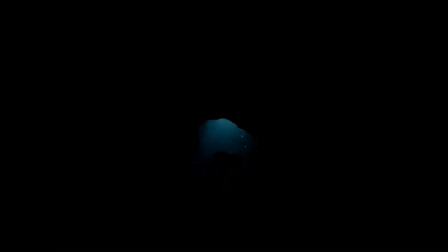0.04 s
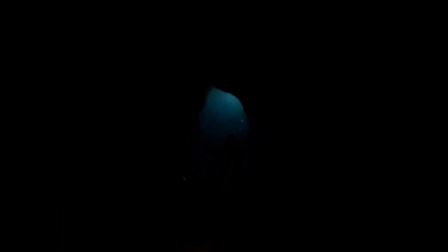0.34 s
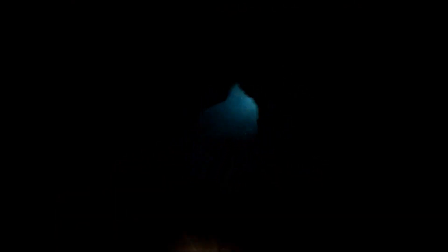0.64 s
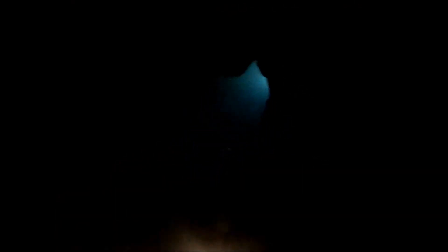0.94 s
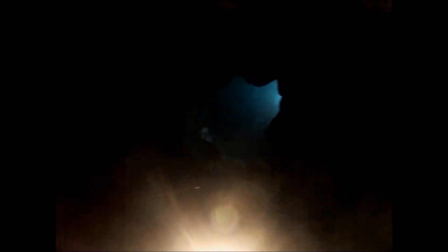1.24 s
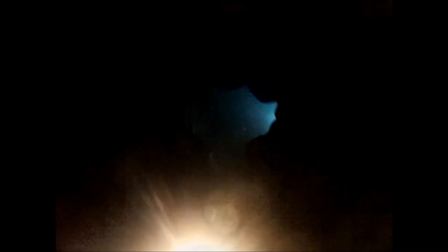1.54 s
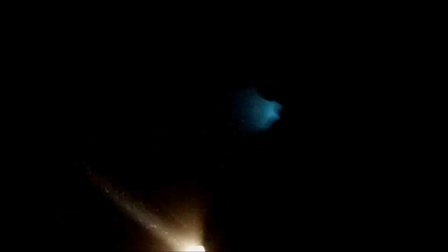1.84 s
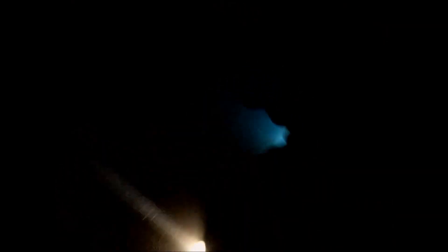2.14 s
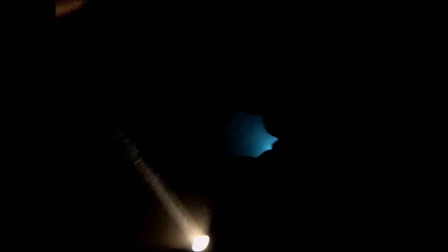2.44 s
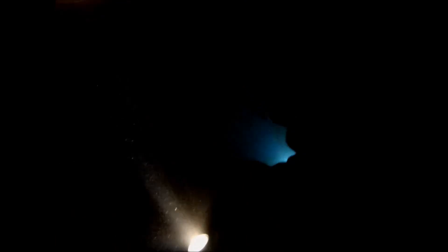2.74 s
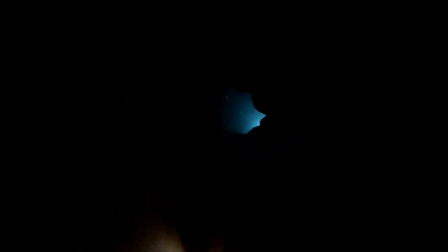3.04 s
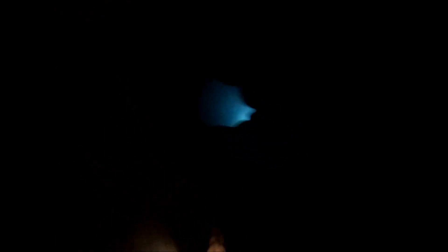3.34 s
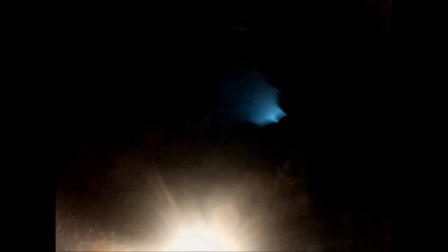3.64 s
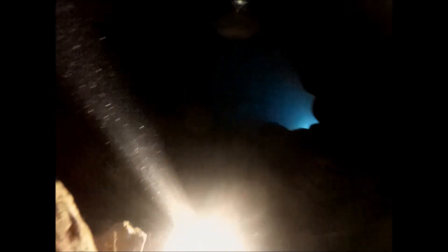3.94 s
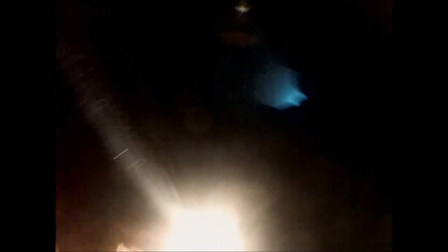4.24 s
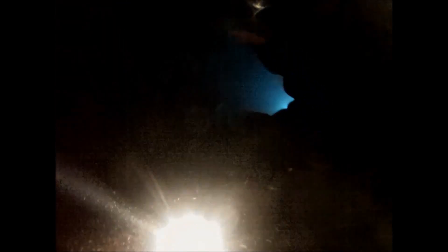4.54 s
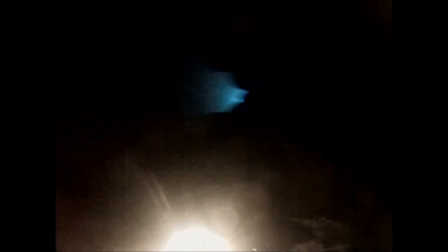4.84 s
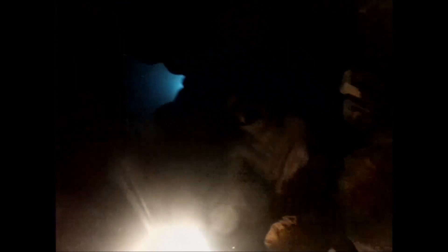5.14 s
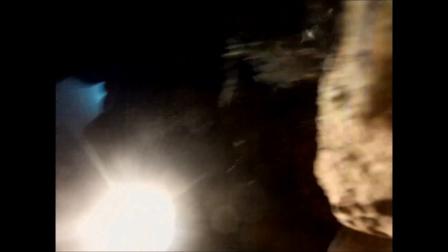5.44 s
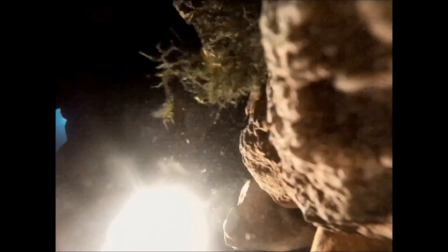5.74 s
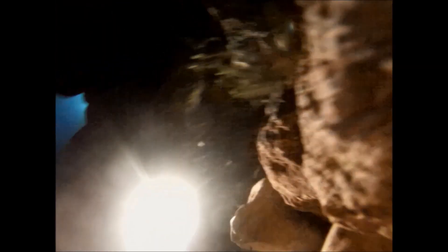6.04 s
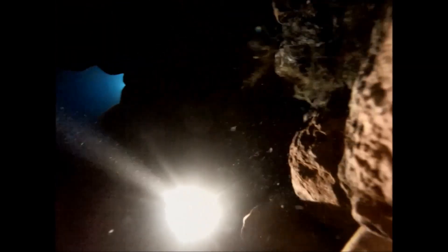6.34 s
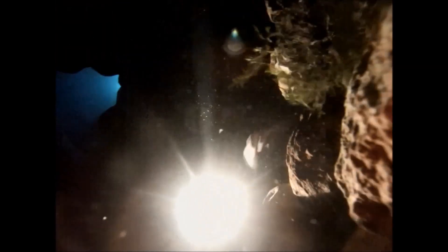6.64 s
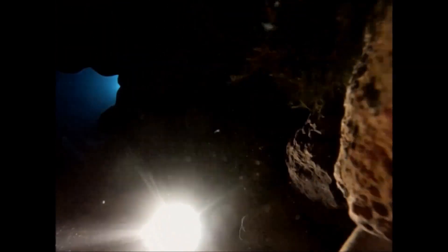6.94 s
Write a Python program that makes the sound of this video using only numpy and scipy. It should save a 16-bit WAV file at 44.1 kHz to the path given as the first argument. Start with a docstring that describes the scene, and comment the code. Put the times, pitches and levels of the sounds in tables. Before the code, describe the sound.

A waterproof camera housing bumps, rattles and scrapes underwater, heard from inside, with gulps of water and a few small bubble chirps.

```python
"""Camera housing in a flooded cave

Underwater, on the move, the microphone sealed inside a camera's waterproof housing. Knocks, rattles
and rubbing reach it straight through the shell, which sways on its mount. Gulps of air and water and
heavy knocks thump close by, and the heaviest overload it. Bubbles chirp, metal gear clinks, and behind
it all lie a hiss, low churning and one faint whistle."""
import sys
import numpy as np
from scipy import signal
from scipy.fft import rfft, irfft
from scipy.io import wavfile
from scipy.ndimage import uniform_filter1d

SR = 44100
rng = np.random.default_rng(int(sys.argv[2]) if len(sys.argv) > 2 else 0)


def generate_wav(sig):
    """Save sig (samples, or channels by samples) to the path in sys.argv[1] as 16-bit PCM at SR."""
    pcm = np.round(np.clip(np.atleast_2d(sig).T, -1, 1) * 32767).astype(np.int16)
    wavfile.write(sys.argv[1], SR, pcm)


N = 312669
TIME = np.arange(N) / SR
CONTACT_SPAN = 0.005 * SR  # a contact's level is its rms as if packed into this many samples


def amp(db):
    """Decibels to gain."""
    return 10 ** (np.asarray(db) / 20)


def unit(x):
    """Scales to an rms of one."""
    return x / np.sqrt(np.mean(x ** 2) + 1e-20)


def follow(curve):
    """A (time, value) curve at every sample."""
    return np.interp(TIME, *np.transpose(curve))


def add(mix, start_s, sound):
    """Mixes a sound in at its start time."""
    part = mix[max(round(start_s * SR), 0):][:len(sound)]
    part += sound[:len(part)]


def band(x, edges, order):
    """Causal band-pass."""
    return signal.sosfilt(signal.butter(order, edges, "bandpass", fs=SR, output="sos"), x)


def noise(colour):
    """Steady noise with the given spectrum."""
    hz, db = np.transpose(colour)
    gain = amp(np.interp(np.log(np.fft.rfftfreq(N, 1 / SR) + 1), np.log(hz), db))
    return unit(irfft(gain * rfft(rng.standard_normal(N)), N))


def wander(per_s):
    """A random drift of about unit size."""
    return np.interp(TIME * per_s, np.arange(N), rng.standard_normal(N))


def slips(size, per_s, spread_db):
    """A train of tiny clicks of uneven size."""
    strengths = amp(spread_db * np.minimum(rng.exponential(1, size), 4))
    return unit((rng.random(size) < per_s / SR) * rng.choice([-1, 1], size) * strengths)


# spectrum of the background hiss: (frequency [Hz], density [dB])
HISS_SPECTRUM = [(20, 2.5), (60, -5.5), (120, -2.5), (280, -8.5), (500, -13), (1000, -16), (2000, -17.5),
                 (3000, -21), (6000, -29), (10000, -34), (14500, -41.5), (16000, -52.5)]
# its rise and fall: (time [s], level [dB])
HISS_LEVEL = [(0, 2.5), (2.76, 1.5), (3.1, -13), (3.7, -10), (4.2, -10.5), (4.7, 1), (5.35, 3), (5.65, 1.5),
              (7.08, 2.5)]

def hiss(level_db=-60):
    """A hiss behind everything, lower through the heavy blows."""
    return amp(level_db + follow(HISS_LEVEL)) * noise(HISS_SPECTRUM)


# swell of the whistle: (time [s], level [dB])
WHISTLE_LEVEL = [(1.21, -100), (1.235, -77), (1.3, -74), (1.33, -100)]
# its partials: (frequency [Hz], level [dB])
WHISTLE_PARTIALS = [(6580, 12), (9800, 0.5), (13050, -4.5)]

def whistle(waver=0.006):
    """A thin, wavering whistle that surfaces briefly in the background."""
    phase_per_hz = 2 * np.pi * np.cumsum(1 + waver * wander(400)) / SR
    tone = sum(amp(db) * np.sin(hz * phase_per_hz) for hz, db in WHISTLE_PARTIALS)
    return amp(follow(WHISTLE_LEVEL)) * tone


# water moving just outside the housing: (time [s], level [dB])
CHURN_LEVEL = [(3.78, -35), (3.87, -32.5), (4.08, -56), (4.28, -60.5), (4.48, -28), (4.66, -44),
               (4.82, -43), (5, -21.5), (5.11, -24.5), (5.22, -29.5), (5.5, -33.5), (5.65, -58),
               (5.93, -34.5), (6.06, -74), (6.28, -35), (6.42, -47.5), (6.84, -42), (7, -75.5)]
# its spectrum: (frequency [Hz], density [dB])
CHURN_SPECTRUM = [(20, -8.5), (60, 7), (170, 0), (260, -9), (450, -19.5), (900, -26.5), (3000, -80)]

def churn(level_db=-5, wake_db=9.5, wake_s=0.051, size=20000):
    """Water churns past the moving housing, stirred up for a moment by each bump."""
    fade_in = np.clip((TIME - CHURN_LEVEL[0][0]) * 20, 0, 1)
    wake = np.ones(N)
    for start, *_ in HOUSING_BUMPS:
        add(wake, start, amp(wake_db) * np.exp(-TIME[:size] / wake_s))
    return fade_in * wake * amp(follow(CHURN_LEVEL) + level_db) * noise(CHURN_SPECTRUM)


def chirp(db, hz, t60, glide, wobble=0.045, rise_s=0.00037, size=8000):
    """One ringing tone, its wobbling pitch creeping upward as it dies."""
    t = TIME[:size]
    waver = 1 + wobble * unit(uniform_filter1d(rng.standard_normal(size), size=60))
    pitch = np.minimum(hz * waver * 2 ** (glide * t), SR / 2)
    envelope = amp(db - 60 * t / t60) * (1 - np.exp(-t / rise_s))
    return envelope * np.sin(2 * np.pi * np.cumsum(pitch) / SR)


# bubble chirps, short clicks and the brief ring of hard knocks:
# (time [s], level [dB], pitch [Hz], t60 [s], glide [octaves/s])
CHIRPS_AND_PINGS = [(.333, -37, 2390, 0.0024, 1), (0.361, -30, 303, 0.026, 5),
                    (.377, -49, 2390, 0.15, 0.28), (0.389, -40, 478, 0.054, 3.3),
                    (0.614, -46, 4900, 0.036, 1), (1.051, -40, 6270, 0.02, 30),
                    (1.057, -42, 9800, 0.011, 8.9), (1.832, -50, 5330, 0.045, 2.2),
                    (2.768, 2, 1613, 0.015, 1), (2.992, -24.5, 479, 0.023, 2.6),
                    (3.0201, -1.5, 1654, 0.015, 1), (3.029, -50, 1526, 0.12, .2),
                    (5.446, -7.5, 1180, 0.017, 3.4), (5.88, -42.5, 1057, 0.17, 0.37),
                    (6.336, -56, 3280, 0.51, .1), (6.43, -46.5, 3370, 0.078, 0.07),
                    (6.433, -40.5, 1990, .08, 0.13)]

def chirps_and_pings(far_count=45, far_db=-66, spread_db=10, low_hz=300, octaves=4, ring_cycles=50):
    """Bubbles chirp, clicks tick and hard knocks ring, over faint bubbles farther off in the cave."""
    out = np.zeros(N)
    for start, db, hz, t60, glide in CHIRPS_AND_PINGS:
        add(out, start, chirp(db, hz, t60, glide))
    for when, smallness, nearness in rng.random((far_count, 3)):
        hz = low_hz * 2 ** (octaves * smallness)
        add(out, when * N / SR, chirp(far_db + spread_db * nearness, hz, ring_cycles / hz, glide=2))
    return out


# metal gear touching, heard from inside the housing: (time [s], clack [dB], ring [dB], pitch [ratio])
GEAR_CLINKS = [(6.594, -37, -70, 1), (6.7359, -25, -30, 1), (6.842, -51, -53, 1.34), (6.856, -52, -51, 1),
               (6.8758, -33.5, -40.5, 1.03)]
# modes of the gear: (frequency [Hz], level [dB], t60 [s])
GEAR_MODES = [(3120, 7, 0.023), (4030, -2, 0.024), (5940, 0.5, 0.069), (6250, -23, 0.077), (7250, -9, .06)]

def clinks(shell, clack_hz=(1900, 7000), fade_s=0.003, size=3000):
    """Metal gear touches: a thin clack through the shell, and the metal's own high ring."""
    out = np.zeros(N)
    for start, clack_db, ring_db, pitch in GEAR_CLINKS:
        touch = np.diff(rng.standard_normal(size + 1)) * np.exp(-TIME[:size] / fade_s)
        clack = band(signal.fftconvolve(touch, shell)[:size], clack_hz, order=3)
        add(out, start, amp(clack_db) * clack * np.sqrt(CONTACT_SPAN) / np.linalg.norm(clack))
        add(out, start, amp(ring_db) * ring([(hz * pitch, db, t60) for hz, db, t60 in GEAR_MODES]))
    return out


def ring(modes, size=26000):
    """Dying sines of a struck object."""
    t = TIME[:size]
    return sum(amp(db - 60 * t / t60) * np.sin(2 * np.pi * hz * t) for hz, db, t60 in modes)


# low thumps close by: gulps of air and water, and the thud of heavy knocks:
# (time [s], level [dB], pitch [Hz], length [cycles])
LOW_THUMPS = [(0.333, -24, 40, 0.63), (1.668, -35, 63, 3.9), (2.765, 12, 495, 0.5), (2.991, -20, 247, 0.57),
              (3.6797, 0.5, 259, 0.49), (3.7245, 7.5, 146, 0.7), (3.803, -2, 145, 0.66),
              (3.83, -12, 157, 0.71), (3.845, -19, 129, 1.9), (3.905, -14, 100, 1.1),
              (3.926, -19.5, 76, 1.33), (3.996, -25, 111, 0.97), (4.327, -36.5, 94, 2.2),
              (4.455, -21.5, 250, 1.6), (4.715, -21.5, 75, 0.31), (4.95, -13, 77, 0.84),
              (4.979, -8, 84.5, 1.95), (5.002, -12.5, 71, 0.58), (5.05, -12.5, 55, 1.2),
              (5.071, -16, 58, 4.3), (5.103, -15, 48, 0.49), (6.258, -21.5, 68.6, 2.7),
              (6.657, -28, 71, 2.9)]

def thumps(onset_cycles=0.011, wobble_db=-27, wobble_cycles=1.2, size=6000):
    """A gulp or a heavy knock swings the pressure: a dip, a rebound, and a faint wobble after it."""
    out = np.zeros(N)
    for start, db, hz, length in LOW_THUMPS:
        cycles = hz * TIME[:size]
        onset = 1 - np.exp(-(cycles / onset_cycles) ** 2)
        fall = np.exp(-(cycles / length) ** 3) + amp(wobble_db) * np.exp(-cycles / wobble_cycles)
        add(out, start, -amp(db) * onset * fall * np.sin(2 * np.pi * cycles))
    return out


# resonances of the shell around the microphone: (frequency [Hz], width [Hz], level [dB])
SHELL_RESONANCES = [(269, 450, 2), (463, 30, -6.5), (706, 250, 2.5), (1123, 490, 3.5), (1494, 570, 4),
                    (1574, 120, 3), (1654, 390, 2.5), (2139, 480, 4.5), (2454, 400, -2),
                    (3330, 2200, -15.5), (3444, 1200, -15.5), (5260, 1500, -17.5), (6040, 1300, -21.5),
                    (6960, 990, -24.5), (8510, 1200, -39), (10340, 3400, -42), (13000, 7700, -41)]
# the shell's body, middle, edge and fizz bands: (low [Hz], high [Hz])
SHELL_BANDS = [(190, 900), (900, 2800), (2800, 8000), (8000, 14500)]

def shell_response(size=2048):
    """The shell's minimum-phase impulse response, whole and split into its bands."""
    freqs = abs(np.fft.fftfreq(size, 1 / SR))
    power = sum(amp(db) ** 2 / (1 + ((freqs - hz) / width * 2) ** 2) ** 2
                for hz, width, db in SHELL_RESONANCES)
    log_gain = 0.5 * np.log(power + 1e-10)
    spectrum = np.exp(np.conj(signal.hilbert(log_gain)))
    shell = np.fft.ifft(spectrum).real[:size // 2]
    return shell, np.array([band(shell, edges, order=3) for edges in SHELL_BANDS])


# narrow shell resonances: (frequency [Hz], width [Hz], level over the direct path [dB])
HOLLOW_RESONANCES = [(1010, 61, -3), (1436, 50, 3.5), (1690, 46, 3.5), (2296, 140, -0.5), (3730, 270, -7),
                     (6320, 270, 2.5), (8770, 180, 3)]

def hollow(drive, detune=0.039, uneven_db=4):
    """A rub or chatter builds up narrow resonances that differ a little with the place of contact."""
    out = drive.copy()
    for hz, width, db in HOLLOW_RESONANCES:
        louder, higher = rng.uniform(-1, 1, 2)
        resonator = signal.iirpeak(hz * (1 + detune * higher), hz / width, fs=SR)
        out += amp(db + uneven_db * louder) * signal.lfilter(*resonator, drive)
    return out


# rubs along the shell, close to the microphone:
# (time [s], length [s], level [dB], swell over the stroke [dB], relative treble [dB])
RUB_STROKES = [(0.839, 0.094, -54.5, -25, -15), (1.154, .1, -47, -8, -28), (1.509, 0.1, -59, 10, -16),
               (1.912, 0.17, -58.5, 6, -18), (2.204, .19, -47.5, -7, -14.5), (2.582, 0.23, -68.5, -12, -24),
               (2.785, 0.073, -50, -21.5, -22), (3.239, 0.11, -40.5, -4, -9),
               (3.427, 0.023, -37, -13, -9.5), (3.457, 0.043, -38.5, 18, -10), (3.499, .18, -36, 11, -8),
               (3.687, .11, -52, -4, -13), (3.81, 0.25, -62.5, 0, -4), (4.007, 0.18, -58, 5, -3),
               (4.245, 0.27, -52, 3, -14.5), (4.398, 0.16, -35.5, -1, -11.5), (4.488, 0.067, -46.5, 9, 4),
               (4.56, 0.11, -49.5, -2, -5), (4.741, 0.077, -43.5, 12, -12),
               (4.837, 0.062, -44.5, -24, -7.5), (4.924, 0.42, -36, -4, -4.5),
               (5.169, 0.17, -32.5, 24, 0.5), (5.352, 0.045, -42, -32, -6), (5.391, 0.0385, -38.5, 14, 3),
               (5.715, 0.072, -62, 10, -5), (5.85, 0.092, -55, 3, -3.5)]

def rubbing(shell, trim_db=-1, fizz_db=-6, judder_db=3.5, snags_per_s=60, snag_db=22):
    """Slips and snags drive the shell; each rub has its own brightness, and brighter rubs fizz more."""
    out = np.zeros(N)
    bite, let_go = 0.12, 0.11  # shares of a stroke
    judder = amp(judder_db * wander(130))
    body_hz, middle_hz, edge_hz, fizz_hz = SHELL_BANDS
    low_cut = band(shell, (340, SR / 2 - 1), order=1)
    responses = (band(low_cut, (body_hz[0], middle_hz[1]), order=4),
                 band(shell, edge_hz, order=3),
                 band(shell, (fizz_hz[0], 10300), order=2))
    for start, length, db, swell_db, treble_db in RUB_STROKES:
        size = round(length * SR)
        snags = amp(snag_db) * (rng.random(SR) < snags_per_s / SR)
        friction = slips(SR, per_s=1100, spread_db=2) + snags + 0.28 * rng.standard_normal(SR)
        drive = hollow(friction[:size]) * judder[round(start * SR):][:size]
        dull, edge, fizz = (unit(signal.fftconvolve(drive, path)[:size]) for path in responses)
        progress = np.linspace(0, 1, size)
        touching = np.clip(np.minimum(progress / bite, (1 - progress) / let_go), 0, 1)
        pressure = amp(db + trim_db + swell_db * (progress - 0.5)) * touching
        bright = edge + amp(fizz_db + min(treble_db + trim_db, 0)) * fizz
        add(out, start, pressure * (dull + amp(treble_db) * bright))
    return out


def contact(bands, db, body_db, edge_db, fizz_db, fade_s, tail_db=-20, size=2048):
    """A brief chatter rings the shell in each band; the higher bands have less tail."""
    t = TIME[:size]
    rise_s, tail_s, tail_db_per_band = 0.00045, 0.0093, -4
    tail = amp(tail_db + tail_db_per_band * np.arange(len(bands)))[:, None] * np.exp(-t / tail_s)
    push = (1 - np.exp(-t / rise_s)) * (np.exp(-t / fade_s) + tail)
    chatter = signal.fftconvolve(hollow(push * rng.standard_normal(size)), bands, axes=1)[:, :size]
    chatter /= np.linalg.norm(chatter, axis=1, keepdims=True)
    levels = db + np.array([body_db, 0, edge_db, edge_db + fizz_db])
    return np.sqrt(CONTACT_SPAN) * amp(levels) @ chatter


# taps directly on the shell:
# (time [s], level [dB], body re level [dB], edge re level [dB], fizz re edge [dB])
SHELL_TAPS = [(0.6962, -24.5, -10, -14.5, -33), (1.141, -31, 0.5, -32, -14), (1.6692, -36, -8, -3, -3),
              (1.814, -52, 5, -10, -18), (2.916, -37, -16, -11.5, -34), (2.935, -55.5, -4, 1.5, -19),
              (3.131, -28, -1.5, -9, -17), (3.148, -20, -39, -8.5, -22), (3.429, -30, -15, -21, -15),
              (3.687, -21.5, 0, -1.5, -6.5), (3.723, -23.5, 4, -11, -26), (3.802, -29.5, -4.5, -11.5, -13),
              (3.903, -37.5, -13, -5, -15), (3.918, -43, -22, 3.5, -15), (3.972, -43.5, -9, -12.5, -26),
              (4.004, -50, 6, 8.5, -14), (4.261, -44, -17.5, -11, -24), (4.408, -26, -6.5, -22.5, -28),
              (4.422, -34.5, -18, -1.5, -26), (4.475, -21, -28, -6, -14), (4.492, -18.5, -6, -6, -21),
              (4.528, -38, 2, 10.5, -13), (4.603, -47, 3, 7, -10), (4.711, -41.5, -8, -14.5, -17),
              (4.744, -35.5, -6.5, -26, -15), (4.917, -21.5, -14, -18, -22), (4.951, -20, -6.5, 3, -18),
              (4.979, -20.5, -2, -3, -15), (5.002, -17.5, -34, 1, -11), (5.036, -18, 2, -5.5, -18),
              (5.101, -18, -0.5, -6, -12), (5.136, -28, 9, -4.5, -11), (5.338, -20.5, -28, -0.5, -5),
              (5.34, -13.5, -6, 2, -13), (5.362, -25.5, -11, 0.5, -5), (5.414, -21.5, -16, -4, -7),
              (5.4457, -24, -4, -5, -26), (5.668, -47, 4.5, -28, -12), (6.135, -42.5, -7, 1.5, -13),
              (6.208, -43.5, 6.5, -5, -21.5), (6.253, -28, 2, -23.5, -17.5),
              (6.275, -18.5, -14, -13.5, -35), (6.633, -40.5, 0, -8, -20)]

def taps(bands, lead_s=0.00078):
    """Light, single contacts that leave the mount still."""
    out = np.zeros(N)
    for start, db, *colour in SHELL_TAPS:
        add(out, start - lead_s, contact(bands, db, *colour, fade_s=0.0027))
    return out


# modes of the mount that carries the housing: (frequency [Hz], level [dB], t60 [s])
MOUNT_MODES = [(61.4, -6.5, 0.74), (122.9, 1, 0.31), (155.4, 3, 0.23), (225, -14, 0.38), (292, -4, 0.081),
               (493, -25, 0.33)]

def sway(upper_hz=200, passband_hz=(70, 900)):
    """The mount hums after bumps, each with its own strength of upper hum; a firm grip raises the pitch."""
    out = np.zeros(N)
    for start, *_, sway_db, grip, upper_db in HOUSING_BUMPS:
        modes = [(hz * grip, db + upper_db * (hz > upper_hz), t60) for hz, db, t60 in MOUNT_MODES]
        add(out, start, -amp(sway_db) * ring(modes))
    return band(out, passband_hz, order=2)


def shudder(bands, body_db=-5, edge_db=-23, decay_db_per_s=240, size=4096):
    """The dull, clicking chatter of the housing in its mount until it settles."""
    t = TIME[:size]
    rise_s, loose_s, settle_s = 0.0041, 0.039, 0.0091
    drive = hollow(slips(size, per_s=900, spread_db=4) + 0.3 * rng.standard_normal(size))
    body, middle, edge = (unit(signal.fftconvolve(drive, path)[:size]) for path in bands[:3])
    settling = np.exp(-np.maximum(t - loose_s, 0) / settle_s)
    envelope = np.minimum(t / rise_s, 1) * amp(-decay_db_per_s * t) * settling
    return envelope * (amp(body_db) * body + middle + amp(edge_db) * edge)


# knocks on the housing, carried straight to the microphone:
# (time [s], blow [dB], body re blow [dB], edge re blow [dB], shudder [dB], first rebound [dB],
#  sway [dB], pitch from the grip [ratio], upper sway modes [dB])
HOUSING_BUMPS = [(.6895, -27, -3, -32, -25.5, -37, -25.5, 1, 6),
                 (1.135, -28.5, -7, -39, -33.5, -67, -32, 1, 6.5),
                 (1.191, -35.5, -15, -25, -40, -55, -31, 1, -4),
                 (1.6661, -10, -12, -22.5, -20, -35, -37, 1, 11.5),
                 (2.033, -60, -1, -20, -53, -72, -51.5, 1, -7), (2.24, -66, -10, -20, -43, -65, -45, 1, -1),
                 (2.7644, -8, -11.5, -0.5, -41.5, -46.5, -33, .65, -14),
                 (3.0189, -15, -12, -13, -46, -53, -38.5, 1.02, 3),
                 (3.1396, -22, -10, -16, -33.5, -28, -30, .97, -40),
                 (3.226, -11, -13.5, -13, -33, -34, -31.5, 1, -21),
                 (3.3832, -19, -10, -20, -39.5, -32.5, -29, 1, -17.5),
                 (3.514, -30, -5, -14, -34, -57, -40, 1.01, -2),
                 (3.68, -15.5, 3.5, 1.5, -27, -39, -41.5, 1, -3),
                 (4.4548, -21, -8, 1.5, -30, -51, -30.5, 1.68, 9.5),
                 (4.84, -33, -10, -25, -36.5, -53, -31.5, 1.55, 3),
                 (5.03, -21, -10, -1.5, -19.5, -19, -30, 1.4, -7),
                 (5.485, -10, -11.5, -17, -21.5, -28, -33.5, 1.4, -7),
                 (5.558, -30.5, -12, -9, -26.5, -32.5, -39, 1.25, -14),
                 (5.7, -38.5, -8.5, -6.5, -58, -61, -40, 1.41, 0),
                 (6.256, -14.5, -9.5, -18, -22.5, -19, -29, 1.29, -24),
                 (6.488, -21, -2.5, -14.5, -28.5, -26.5, -35.5, 1.43, -29),
                 (6.653, -35, 4.5, -8, -35.5, -32, -35, 1.2, -23),
                 (6.758, -27, -1, -26, -32.5, -40, -34.5, 1.16, -20)]
# tone of a rebound: (body re level [dB], edge re level [dB], fizz re edge [dB])
REBOUND_TONE = (-21.5, -6, -24.5)

def bumps(bands, lead_s=0.0005, graze_s=0.0015, swing_s=0.0155, rebounds=3, loss_db=10.5):
    """A blow lands; the housing shudders and rebounds once per swing of the mount, weaker each time."""
    out = np.zeros(N)
    for start, db, body_db, edge_db, shudder_db, rebound_db, *_ in HOUSING_BUMPS:
        fizz_db = -13.5 + 0.57 * edge_db  # a sharper blow has more fizz
        add(out, start - lead_s, contact(bands, db, body_db, edge_db, fizz_db, fade_s=0.0024))
        add(out, start - graze_s, amp(shudder_db) * shudder(bands))
        for k in range(rebounds):
            level_db = rebound_db - k * loss_db
            rebound = contact(bands, level_db, *REBOUND_TONE, fade_s=0.0017, tail_db=-28.5)
            add(out, start + (k + 1) * swing_s, rebound)
    return out


def scene():
    """The cave in mono, from the microphone inside the housing."""
    shell, bands = shell_response()
    handling = rubbing(shell) + bumps(bands) + taps(bands) + sway()
    return (handling + thumps() + chirps_and_pings() + clinks(shell) + churn() + hiss() + whistle())[None]


def record(dry):
    """The heaviest blows clip at the microphone; the treble ends near 16 kHz."""
    clipped = np.clip(dry, -1, 1)
    low_pass = signal.firwin(511, 16200, window=("kaiser", 9), fs=SR)
    return signal.oaconvolve(clipped, low_pass[None], "same")


dry = scene()
out = record(dry)
generate_wav(out)
```